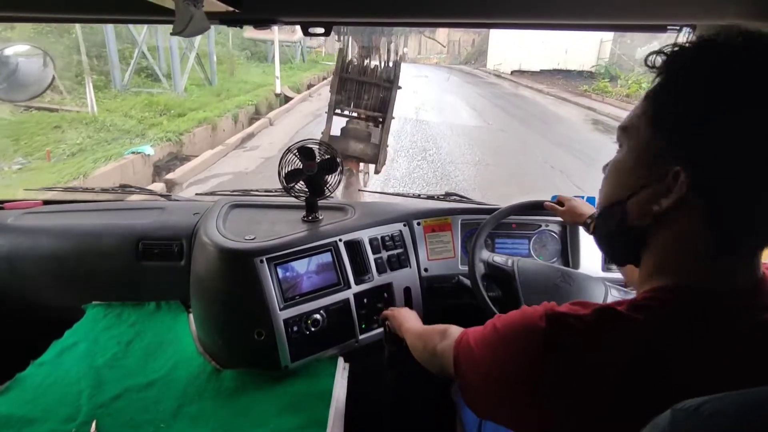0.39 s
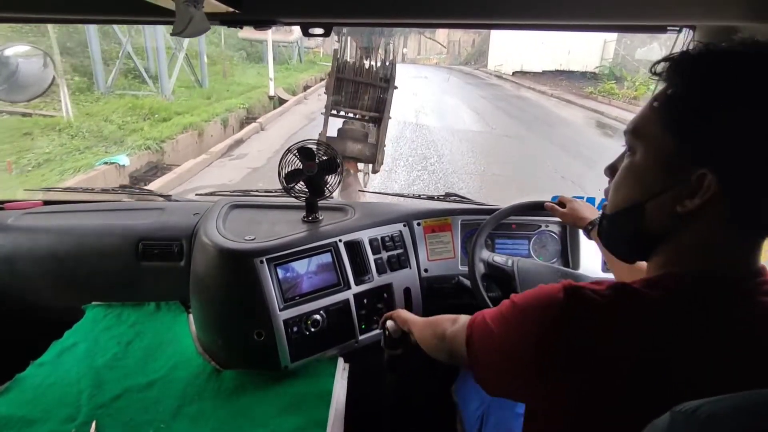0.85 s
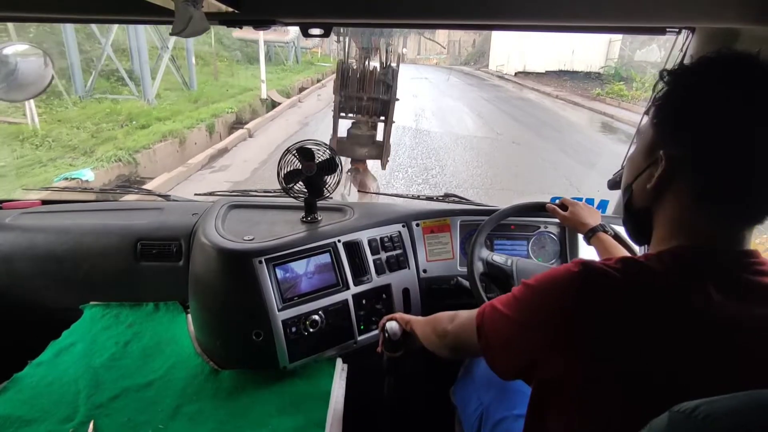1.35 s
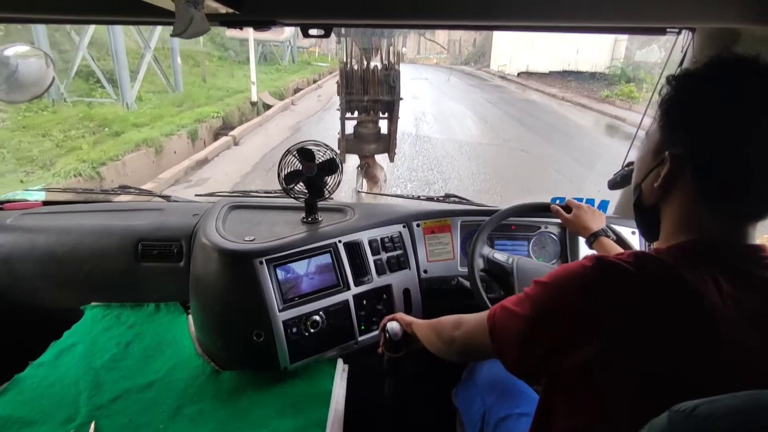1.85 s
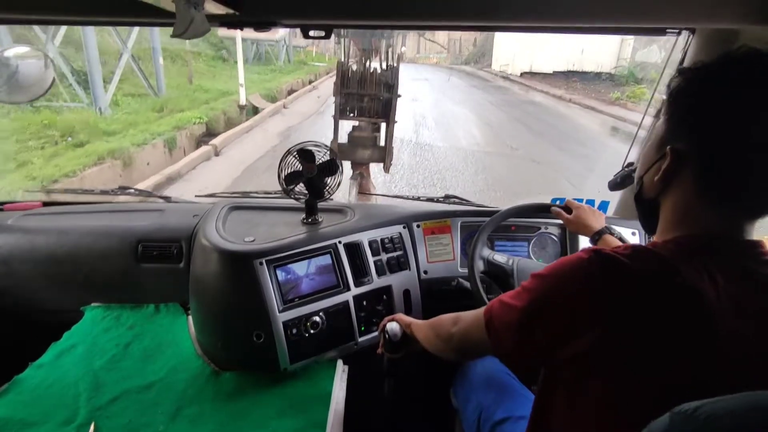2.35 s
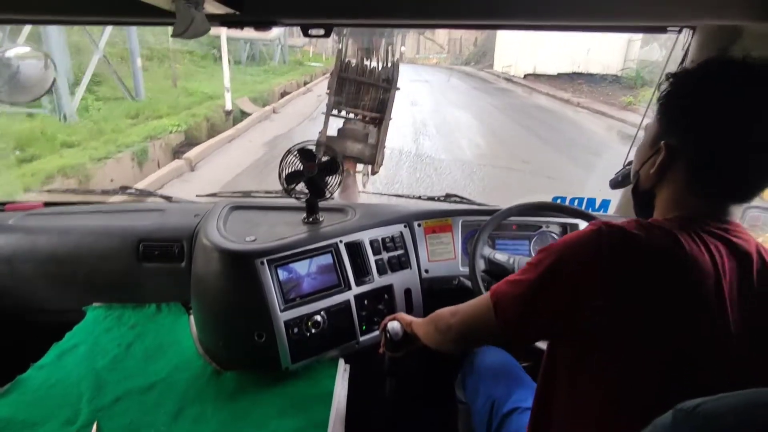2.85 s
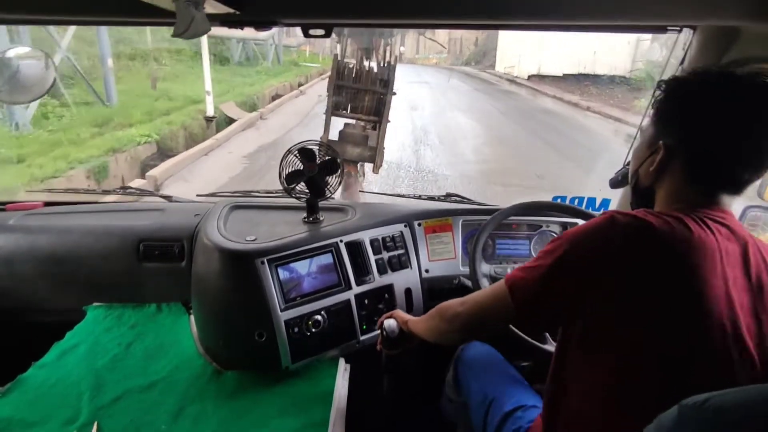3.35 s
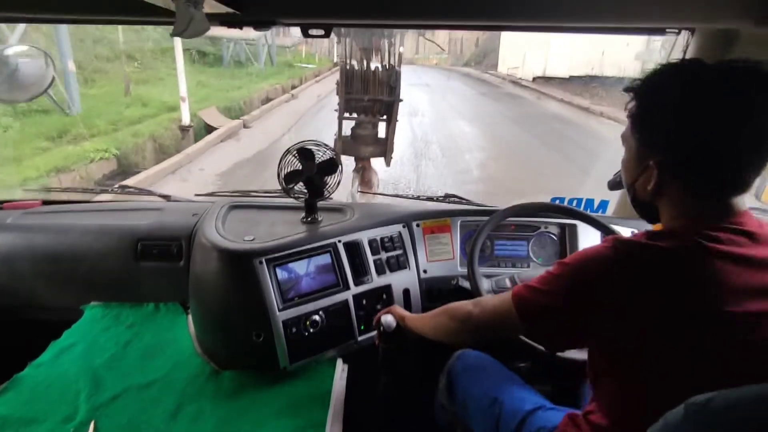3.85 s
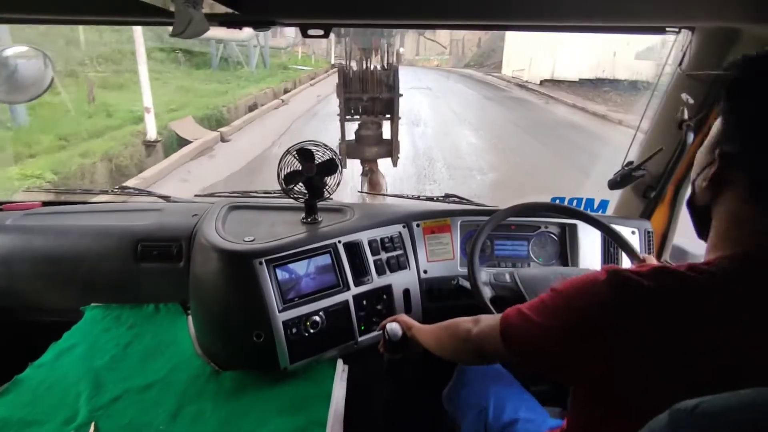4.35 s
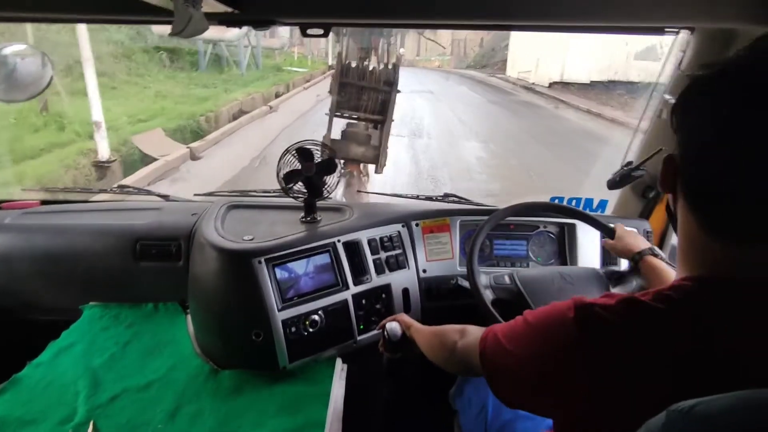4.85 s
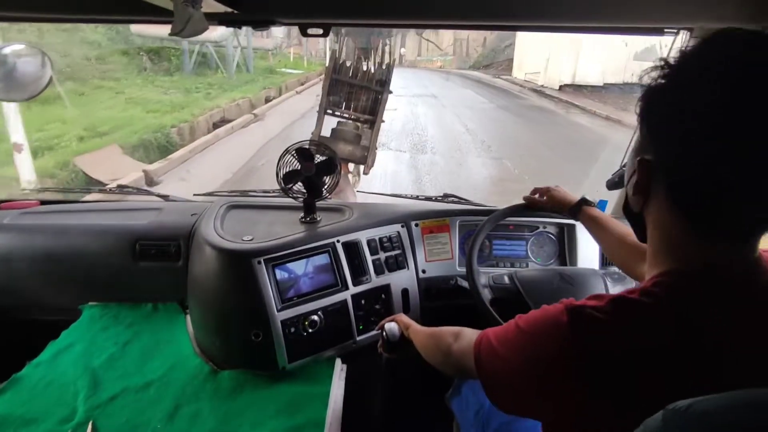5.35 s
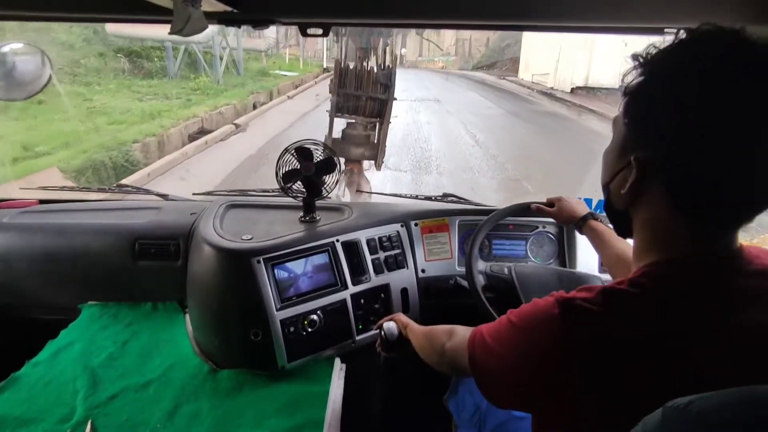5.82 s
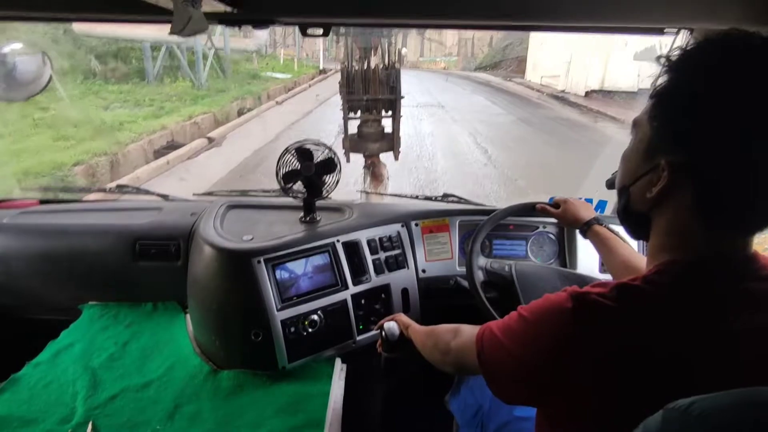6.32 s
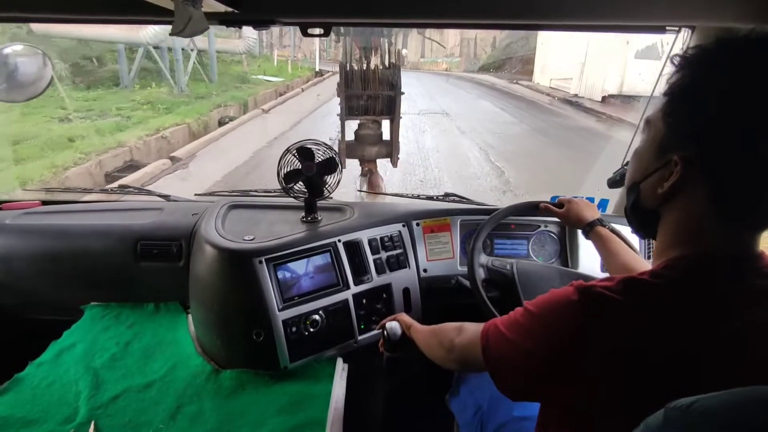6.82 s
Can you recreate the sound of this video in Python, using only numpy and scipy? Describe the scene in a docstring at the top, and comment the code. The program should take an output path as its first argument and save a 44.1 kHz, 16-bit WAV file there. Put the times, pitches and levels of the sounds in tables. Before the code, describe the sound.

Heard inside a heavy truck cab, a large six-cylinder diesel runs throughout. From 0 to about 0.8 s its drone slides down sharply as revs fall after a gear change, from roughly 76 to 53 firings a second. It then pulls under load, climbing slowly and unevenly to about 75 firings by 3 s and 100 by 5 s, growing louder and fuller around 3.6 s, and holding near 107 from 6 s until the cut at 7 s. Uneven firing booms through the cab; a wavering panel hum near 250 Hz comes and goes. Mid-range combustion roar rings metal covers, and a soft leak puffs once per engine cycle, blurring into hiss at speed. Loose trim rattles briefly near 1.8 and 3.6-3.9 s. An extremely faint turbo whistle rises, then eases slightly; road rumble stays deep and faint. Close stereo, dull treble overall.

```python
"""Inside the cab of a heavy truck climbing a hill: a six-cylinder diesel sags after a gear change.
From the start exhaust orders drone, a panel hums, firing blows boom in the cab's modes, shaped noise
roars and rings the engine covers, a leak puffs once an engine cycle, and the road rumbles faintly.
The engine then winds up: a wavering sine whistles for the turbo, and noise bursts rattle loose trim.
At last the engine holds its speed; two microphone ports, each with its own treble response, hear it all."""
import sys
import numpy as np
from scipy import signal
from scipy.fft import rfft, irfft, next_fast_len
from scipy.io import wavfile
from scipy.ndimage import uniform_filter1d, map_coordinates

SR = 44100
rng = np.random.default_rng(int(sys.argv[2]) if len(sys.argv) > 2 else 0)


def persist_wave(psi):
    """Save psi, clipped to +-1, as 16-bit WAV."""
    counts = np.round(np.clip(psi, -1, 1) * 32767).astype(np.int16)
    wavfile.write(sys.argv[1], SR, np.atleast_2d(counts).T)


def linear_from_db(decibels):
    """Turn decibels (scalar or array-like) into linear amplitude factors; 0 gives 1."""
    return 10 ** (np.asarray(decibels, float) / 20)


N = 306495  # length in samples


def unit(x):
    """Normalization by signal power: scales x to rms 1."""
    return x / np.sqrt(np.mean(x ** 2) + 1e-20)


def along(points, hz):
    """Interpolation in log frequency: reads (frequency_hz, value) points at hz."""
    f, v = np.transpose(points)
    return np.interp(np.log(hz + 1), np.log(f + 1), v)


def curves(rows):
    """Linear interpolation in time: one value per sample for each column after start_s."""
    start_s, *columns = np.transpose(rows)
    return [np.interp(np.arange(N) / SR, start_s, column) for column in columns]


def wobble(rate):
    """Band-limited random modulation: a smooth curve through rate random knots a second."""
    knots = rng.standard_normal(int(N * rate / SR) + 4)
    return map_coordinates(knots, [np.arange(N) * rate / SR])


def filtered(x, response):
    """Linear filtering: multiplies the spectrum of x by a complex response of frequency."""
    m = next_fast_len(N + SR // 2)
    return irfft(rfft(x, m) * response(np.fft.rfftfreq(m, 1 / SR)), m)[..., :N]


def resonance(mode):
    """Damped harmonic oscillator: the causal response of one (frequency_hz, width_hz, level_db) mode."""
    center, width, db = mode
    return lambda f: linear_from_db(db) * 1j * f * width / (center ** 2 - f ** 2 + 1j * f * width)


# Correlation of left and right in the cab's diffuse sound: frequency_hz, likeness (1 = identical)
LIKENESS = [(80, 0.94), (250, 0.73), (390, 0.7), (480, -0.11), (640, 0.89), (750, 0.15), (950, 0.49),
            (1120, -0.56), (1400, -0.28), (1700, 0.071), (2300, 0.3), (3000, -0.051), (5500, 0.083),
            (6600, -0.21), (8000, -0.041)]


def diffuse():
    """Interaural coherence: stereo white noise, alike in the bass and mostly unrelated in the treble."""
    def balance(hz):
        turn = np.arccos(np.clip(along(LIKENESS, hz), -1, 1)) / 2
        return np.array([np.cos(turn), np.sin(turn)])

    mid, side = filtered(rng.standard_normal((2, N)), balance)
    return np.array([mid + side, mid - side])


def patchy(x, patchy_db):
    """Time-frequency modulation: random gain patches a few hundred Hz wide and some 40 ms long."""
    z = signal.stft(x, nperseg=512)[2]
    field = uniform_filter1d(rng.standard_normal(z.shape[1:]), size=4, axis=0)
    field = uniform_filter1d(field, size=7, axis=1)
    return unit(signal.istft(z * linear_from_db(patchy_db * unit(field)), nperseg=512)[1][:, :N])


# Strong multiples of the engine cycle of six firings: multiple
LOW_MULTIPLES = [6, 12]
# Strength of each, added to the path gain: level_db
LOW_MULTIPLE_DB = [-2.5, 1]
# Transmission of the low multiples through exhaust and cab: pitch_hz, level_db
PATH = [(52, -32), (57, -27), (62, -21.5), (68, -31), (72, -44), (75, -31), (80, -27.5), (88, -34),
        (92, -25.5), (98, -24.5), (102, -17), (108, -27.5), (116, -29), (122, -39), (127, -30), (133, -25),
        (140, -24.5), (149, -22), (157, -26), (166, -36), (175, -31), (184, -24), (192, -39), (203, -28),
        (214, -29)]
# Upper multiples, likely a gear mesh: start_s, growl just above the 18th level_db, 20th level_db, 40th level_db
UPPER = [(0, -30, -18, -63), (.35, -34, -50, -60), (.5, -22, -48, -60), (.7, -29, -36, -58),
         (0.921, -17.5, -31, -60), (1.1, -28, -30, -60), (1.5, -26.5, -54, -49), (1.9, -30, -28, -54),
         (2.3, -30, -24, -50), (2.5, -22.5, -37, -45), (2.8, -24, -32, -48), (3.1, -26, -22.5, -51),
         (3.5, -30, -19.5, -53), (3.7, -30, -30.5, -53), (3.9, -22.5, -26, -51), (4.15, -23, -32, -50),
         (4.3, -26, -25, -44), (4.5, -31, -27, -52), (4.7, -33, -21, -52), (4.95, -29, -35, -43),
         (5.3, -40, -27.5, -38), (5.5, -41, -35, -50), (6.0, -33, -32.5, -46), (6.3, -26, -25.5, -41),
         (6.55, -27, -24, -46), (6.95, -30, -27, -54)]
# Ninth multiple, heard briefly as it crosses a cab mode: start_s, level_db
NINTH = [(0, -38), (4.2, -46), (4.5, -28), (4.8, -27), (5.1, -30.5), (6.95, -33)]


def drone(firings, rate_hz):
    """Harmonic series of a periodic source: low orders nearly pure, higher ones fluttering and rougher."""
    cycle = 2 * np.pi * firings / 6

    def order(k, roughness):
        level_db = 2.6 * roughness * wobble(16) + roughness * wobble(5)
        return linear_from_db(level_db) * np.sin(k * cycle + 0.9 * roughness * wobble(14))

    # the twelfth fades while the engine slows off the throttle
    coast_db_per_hz_s = 0.01
    slowing = np.minimum(np.gradient(rate_hz) * SR, 0)
    coast_db = coast_db_per_hz_s * uniform_filter1d(slowing, size=SR // 10)

    low = 0
    low_roughness = (0.08, 0.4 + 0.5 * (rate_hz > 85))  # the twelfth roughens at speed
    for k, db, roughness in zip(LOW_MULTIPLES, LOW_MULTIPLE_DB, low_roughness):
        level_db = db + along(PATH, k * rate_hz / 6) + coast_db * (k > LOW_MULTIPLES[0])
        low = low + linear_from_db(level_db) * order(k, roughness)

    upper = 0
    upper_roughness = (0.45 + 0.6 * (rate_hz > 62), 1.2, 1.2, 0.6)
    for k, db, roughness in zip((18.3, 20, 40, 9), curves(UPPER) + curves(NINTH), upper_roughness):
        upper = upper + linear_from_db(db) * order(k, roughness)

    fourth = linear_from_db(-44.5) * order(4, 0.1)  # a weak hum below the others
    return np.sqrt(2) * (low + upper + fourth)


# Humming panel with a drifting pitch: start_s, pitch_hz, level_db
PANEL = [(0, 256, -27), (.3, 252.5, -28.5), (.6, 245.7, -34), (2.6, 250.2, -49), (3.0, 248.1, -26),
         (3.3, 250.7, -22.5), (3.9, 255.8, -30), (4.3, 258.5, -23.5), (4.95, 252, -22), (5.15, 255, -35),
         (5.4, 258.3, -19.5), (6.05, 259, -22.5), (6.3, 265.7, -34), (6.68, 275, -21.5), (6.95, 270, -28)]


def panel():
    """Narrow-band vibration: a sine near the panel's own pitch, wavering in frequency and level."""
    hz, db = curves(PANEL)
    phase = 2 * np.pi * np.cumsum(hz + 6 * wobble(12)) / SR
    return np.sqrt(2) * linear_from_db(db + 2.1 * wobble(11)) * np.sin(phase)


# Blow strength of the cylinders in firing order: level_db
CYLINDERS = [-3, -1, -0.5, -2.5, 1.54, -3.5]
# Air and panel modes of the cab: frequency_hz, width_hz, level_db
CAB = [(128, 114, -9), (206.5, 35, -5), (250.2, 34.3, -3.5), (325.4, 28.3, -3), (345.2, 17.4, -4.5),
       (393.6, 23.6, -3), (443.2, 21.4, -6)]


def boom(firings, boom_db, upper_db):
    """Modal excitation: uneven firing blows and road rumble ring the cab's modes, which swell apart."""
    at = np.flatnonzero(np.diff(np.floor(firings)) > 0)
    strength = linear_from_db(np.resize(CYLINDERS, len(at)) + 1.2 * rng.standard_normal(len(at)))
    blows = np.zeros(N)
    blows[at] = strength - 1.066 * strength.mean()  # the even part of the blows is the drone

    band = lambda hz: 1 / (1 + (hz / 470) ** 8) / (1 + (80 / (hz + 1)) ** 6)
    drive = filtered(0.31 * unit(blows) + diffuse(), band)
    # neighbouring modes ring in opposite sign
    rings = [(-1) ** k * filtered(drive, resonance(mode)) for k, mode in enumerate(CAB)]
    scale = np.sqrt(np.mean(sum(rings) ** 2))

    lumps_db = 0.9 * wobble(5) + 1.3 * wobble(10)  # shared by all modes
    swells = [linear_from_db(lumps_db + wobble(7) + upper_db * (hz > 290)) for hz, _, _ in CAB]
    return linear_from_db(boom_db - 1.0) / scale * sum(swell * ring for swell, ring in zip(swells, rings))


# Relative spectrum of combustion noise: frequency_hz, level_db per Hz
ROAR = [(250, -22), (430, -12), (480, -4.5), (706, -12), (763, -10), (1020, -18.5), (1110, -17.5),
        (1230, -18), (2080, -30), (3380, -33.5), (6000, -49.5), (7800, -63), (13200, -120)]
# Ringing engine covers: frequency_hz, width_hz, level_db
COVERS = [(600, 28, 2), (760, 24, 6), (830, 25, 1), (1000, 14, 6), (1200, 20, 2)]


def roar(firings, roar_db):
    """Amplitude-modulated noise: combustion through the floor breathes with firing and rings the covers."""
    spectrum = lambda hz: linear_from_db(along(ROAR, hz))
    pulse = 1 + 0.068 * np.cos(2 * np.pi * firings)
    noise = filtered(patchy(diffuse(), patchy_db=1.44), spectrum)
    drive = filtered(diffuse(), spectrum)
    # each cover comes and goes on its own
    covers = sum(linear_from_db(1.5 * wobble(3)) * filtered(drive, resonance(mode)) for mode in COVERS)
    waver_db = 0.6 * wobble(5)
    return linear_from_db(roar_db + waver_db) * unit(pulse * (noise + covers))


# Relative spectrum of the escaping gas: frequency_hz, level_db per Hz
GAS = [(1000, -24), (2000, -5.5), (4000, -9.5), (6000, -12), (14000, -20)]


def leak(firings, hiss_db, share):
    """Turbulent jet noise: one cylinder puffs each six firings over a steady hiss, in wavering bands."""
    cycle = firings / 6
    angle = 2 * np.pi * (cycle - 0.54)
    puff = np.exp(2.05 * np.cos(angle + 0.17 * np.cos(angle)))  # rises a little faster than it falls
    size = linear_from_db(0.6 * rng.standard_normal(int(cycle[-1]) + 1))[cycle.astype(int)]
    share = np.clip(share, 0, 1)

    gas = patchy(filtered(diffuse(), lambda hz: linear_from_db(along(GAS, hz))), patchy_db=2.0)
    low = filtered(gas, lambda hz: 1 / (1 + (hz / 6500) ** 6))
    middle = filtered(gas, lambda hz: 1 / (1 + (hz / 10000) ** 8)) - low
    high = gas - low - middle

    hiss = 0
    for part, band in zip((0.65, 1, 0.9), (low, middle, high)):  # the low hiss puffs least
        power = 1 - part * share + part * share * size * puff / puff.mean()
        waver = linear_from_db(0.8 * wobble(14) + 0.6 * wobble(4))
        hiss = hiss + np.sqrt(power) * waver * band
    return linear_from_db(hiss_db + 1.0) * hiss


def road():
    """Low-pass filtered noise: a faint deep rumble from the wheels."""
    deep = lambda hz: (hz > 18) / (1 + (hz / 60) ** 4)
    return linear_from_db(-44.0 + 2.5 * wobble(3.14)) * unit(filtered(diffuse(), deep))


# Whistle of the compressor blades: start_s, pitch_hz, level_db
TURBO = [(.8, 8500, -80), (1.5, 8700, -71), (2, 8950, -73), (2.5, 9600, -76), (2.81, 10200, -65),
         (3.2, 10830, -65), (3.5, 11350, -64), (3.72, 11770, -60), (3.9, 12050, -66), (4.26, 12500, -68),
         (4.7, 12640, -68), (5.24, 12490, -69), (5.75, 12140, -69), (6.25, 11700, -69), (6.5, 11560, -71),
         (6.75, 11330, -72), (6.95, 11280, -69)]


def turbo():
    """Blade-passing tone: a frequency-modulated sine, unsteady in pitch and strength."""
    hz, db = curves(TURBO)
    phase = 2 * np.pi * np.cumsum(hz + 80 * wobble(150) + 12 * wobble(8)) / SR
    flicker_db = 2.5 * wobble(40) + 1.1 * wobble(6)
    return linear_from_db(db + flicker_db) * np.array([np.sin(phase), np.sin(phase + 0.9)])


# Loose trim rattles: start_s, level_db (relative, before the burst's envelope and filter)
RATTLES = [(1.778, -21.5), (1.8394, -36), (1.908, -22), (3.585, -26), (3.645, -25), (3.72, -21), (3.8, -27),
           (3.869, -30)]


def rattles():
    """Transient noise with exponential decay: short bright bursts from loose trim."""
    out = np.zeros((2, N + SR))
    t = np.arange(SR // 8) / SR
    for start_s, db in RATTLES:
        envelope = (1 - np.exp(-t / 0.006)) * linear_from_db(db - 9 - 60 * t / 0.12)  # falls 60 dB in 0.12 s
        first = round(start_s * SR)
        out[:, first:first + len(t)] += envelope * rng.standard_normal((2, len(t)))
    bright = lambda hz: 1 / (1 + (1800 / (hz + 1)) ** 4) / (1 + (hz / 8000) ** 2)
    return filtered(out[:, :N], bright)


# Engine speed: start_s, firing_rate_hz
SPEED = [(0.0, 75.76), (0.4, 61.3), (0.6, 55.4), (0.78, 53.2), (0.95, 54.6), (1.1, 57.3), (1.3, 57.9),
         (1.5, 60.4), (1.9, 63.0), (2.08, 66.5), (2.45, 67.8), (2.72, 72.6), (3.1, 75.0), (3.3, 78.4),
         (3.6, 82.6), (4.2, 91.2), (4.55, 95.0), (4.9, 100.6), (5.6, 105.7), (6.05, 107.0), (6.95, 106.6)]
# Engine load as heard: start_s, roar level_db, gas hiss level_db (relative)
LOAD = [(0, -31.5, -51), (.5, -33, -51.5), (1.5, -33.5, -50.5), (2.1, -32, -50), (2.9, -31, -48),
        (3.6, -28, -47.5), (4.2, -28.5, -46.5), (4.75, -29, -48.5), (5.1, -30.5, -50), (5.7, -28, -49.5),
        (6.0, -28.5, -50.5), (6.3, -28, -50.5), (6.95, -29, -53)]
# Cab boom: start_s, level_db (relative)
BOOM = [(0, -16.5), (.5, -19), (1.5, -19), (2.1, -17.5), (2.9, -18.5), (3.6, -14.5), (4.2, -14),
        (4.75, -15.5), (5.1, -17.5), (5.7, -14.5), (6.0, -15.5), (6.3, -14), (6.95, -16.5)]


def scene():
    """Superposition of phase-locked sources: drone, boom, roar and leak share one count of firings."""
    rate_hz, = curves(SPEED)
    firings = np.cumsum(rate_hz) / SR
    octaves = np.log2(rate_hz / 80)  # from a middling firing rate of 80 Hz
    roar_db, hiss_db = curves(LOAD)
    boom_db, = curves(BOOM)
    upper_db = -1 + 4 * octaves  # speed brightens the boom: upper cab modes over lower
    puff_share = 0.36 - 0.56 * octaves  # speed blurs the puffs into the hiss
    engine = drone(firings, rate_hz) + panel() + boom(firings, boom_db, upper_db) + roar(firings, roar_db)
    return engine + leak(firings, hiss_db, puff_share) + road() + turbo() + rattles()


def band_limit(x):
    """A steep low-pass at the top of the band."""
    return signal.sosfilt(signal.butter(12, 14750, fs=SR, output="sos"), x)


# Response of the left microphone port: frequency_hz, level_db
LEFT_PORT = [(5000, 2), (5600, -0.5), (7200, 2.5), (8800, 12), (10000, 6.5), (11200, -5), (12500, 11),
             (13500, -6), (14100, -12), (14500, -35)]
# Response of the right microphone port: frequency_hz, level_db
RIGHT_PORT = [(5000, 4), (5600, -2), (6800, 7), (7000, -6), (8200, 1), (9200, 6), (10500, 14),
              (11700, 18.5), (13000, 16.5), (14200, 10.5), (14550, -33)]
# Balance of the ports: frequency_hz, left over right level_db
LEAN = [(60, 0), (105, 0.5), (150, 4), (370, 0.5), (1250, 2.5), (2300, 0.5), (4200, 3.5)]


def record(dry):
    """Transducer response and limiting: ports colour the treble, deep bass is cut, swells are turned down."""
    def ports(hz):
        half_lean = along(LEAN, hz) / 2
        return linear_from_db(np.array([along(LEFT_PORT, hz) + half_lean, along(RIGHT_PORT, hz) - half_lean]))

    bass_cut = lambda hz: 0.074 + 0.88 / (1 + (50 / (hz + 1)) ** 10)
    heard = filtered(dry, lambda hz: ports(hz) * bass_cut(hz))
    loudness = np.sqrt(np.abs(uniform_filter1d(np.mean(heard ** 2, axis=0), size=600)))
    gain = uniform_filter1d(1 / (1 + (loudness / 0.37) ** 3) ** (1 / 3), size=400)
    fade = np.clip(np.minimum(np.arange(N), N - np.arange(N)) / 200, 0, 1)  # soft first and last moments
    mix = heard * gain * fade
    return band_limit(mix)


dry = scene()
out = record(dry)
persist_wave(out)
```